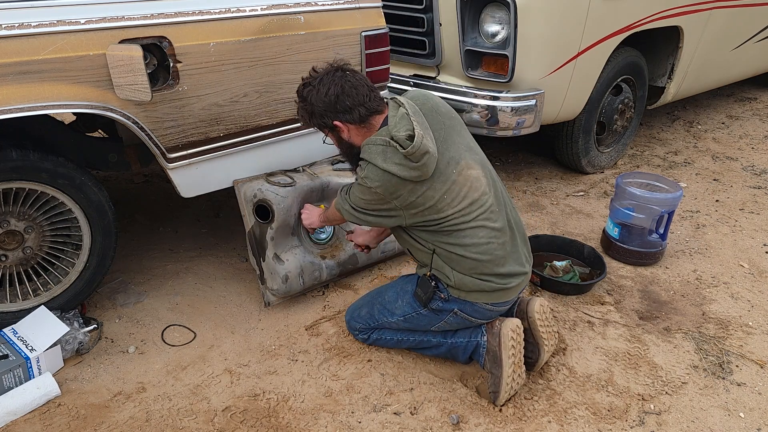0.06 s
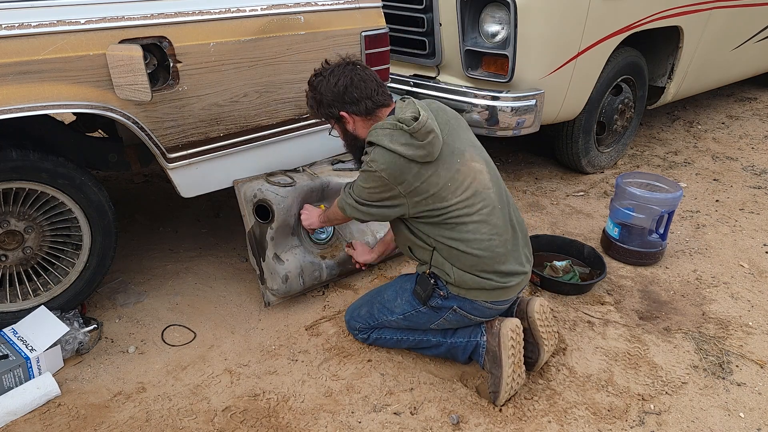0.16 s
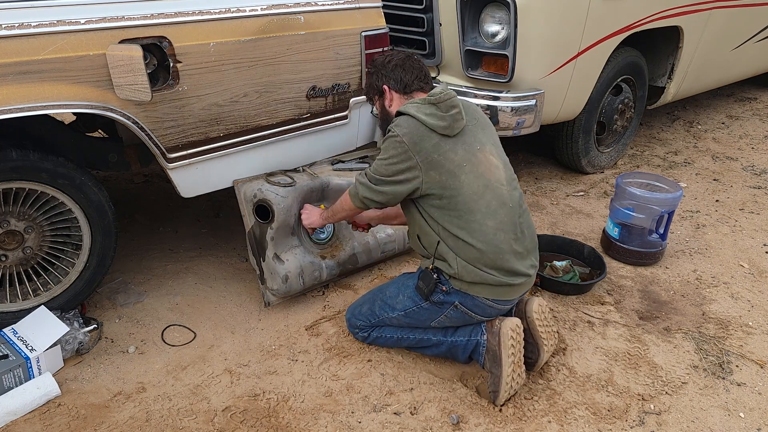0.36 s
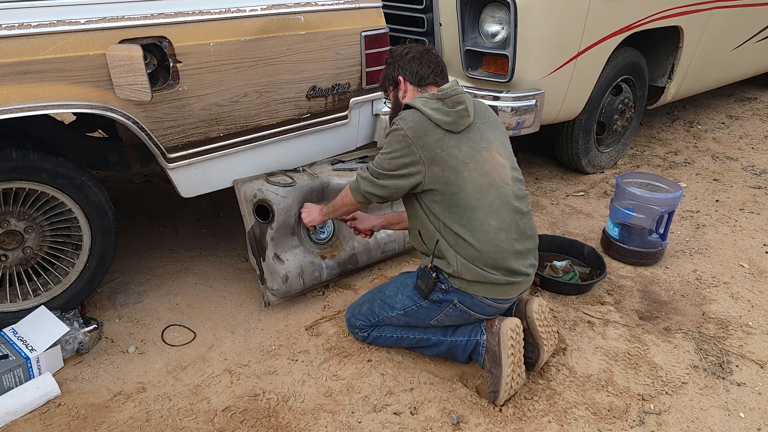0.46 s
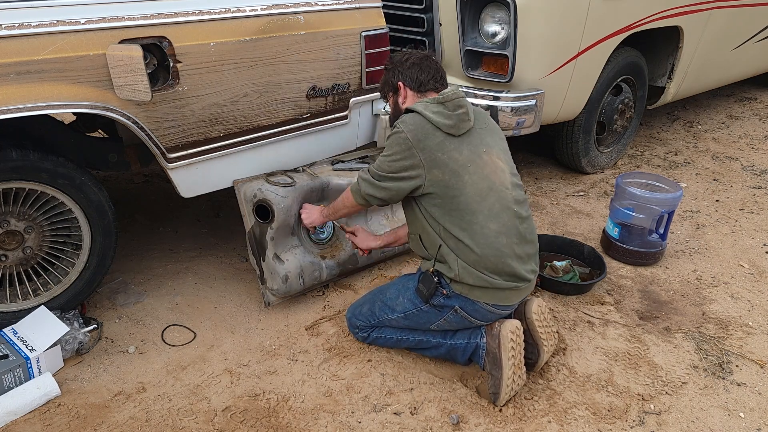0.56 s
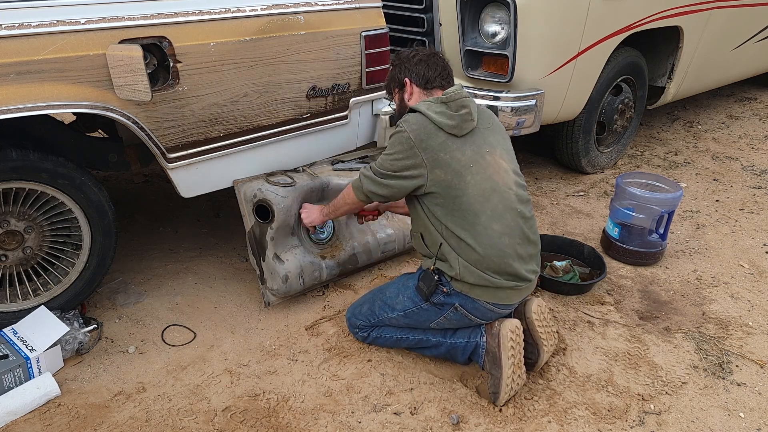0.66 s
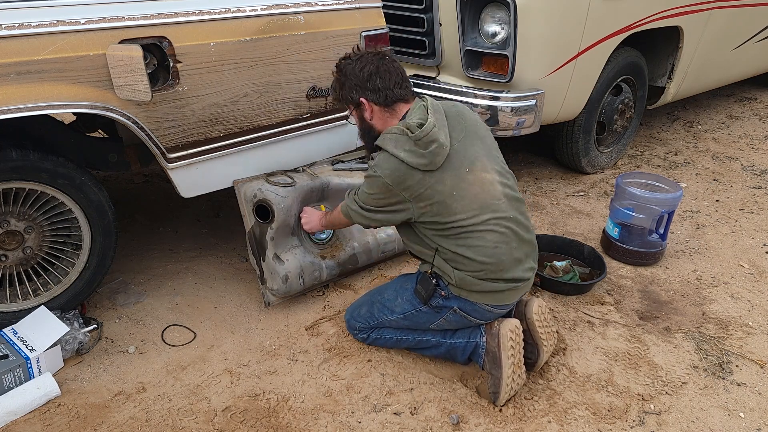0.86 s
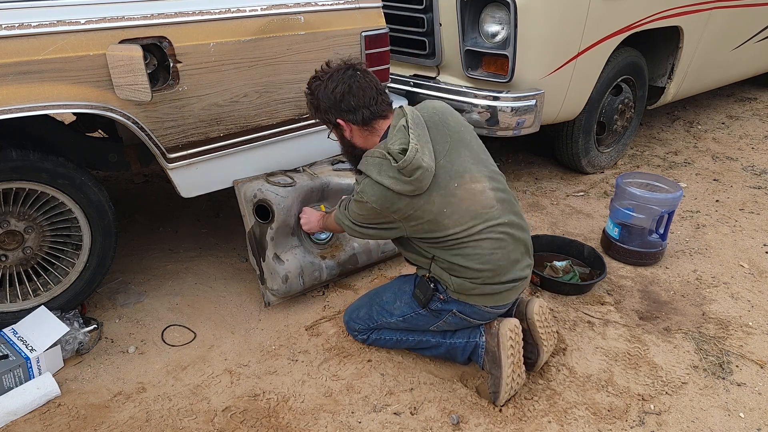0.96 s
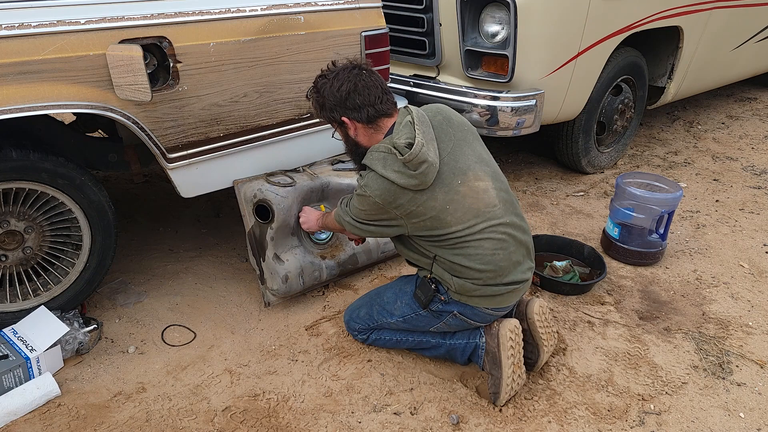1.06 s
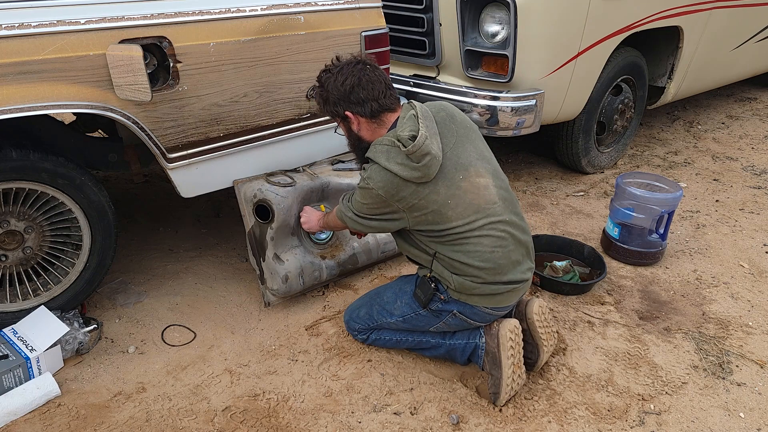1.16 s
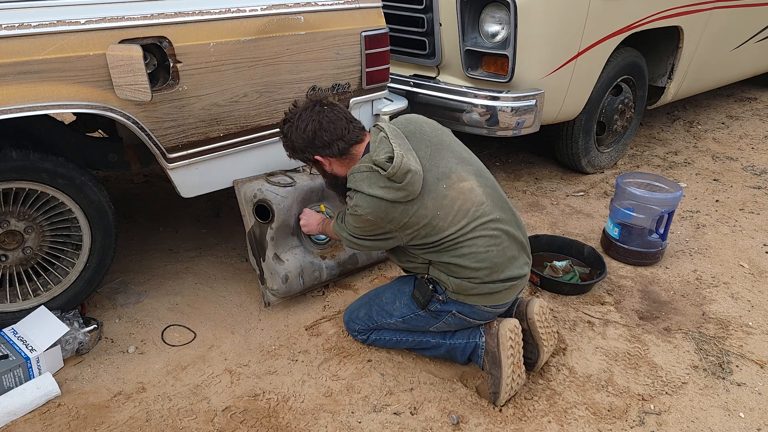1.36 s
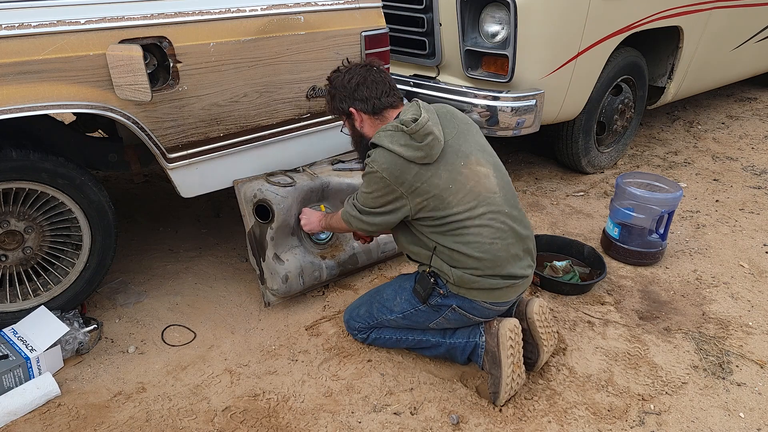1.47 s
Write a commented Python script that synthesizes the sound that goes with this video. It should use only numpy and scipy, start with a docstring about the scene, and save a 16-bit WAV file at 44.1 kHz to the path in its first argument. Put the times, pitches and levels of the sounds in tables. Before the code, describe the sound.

A metal ring clicks, knocks and scrapes against a steel fuel tank outdoors.

```python
"""Outdoors, at a steel fuel tank standing on sand, hands work a metal lock ring into the opening.
One firm clack comes early among the taps, ticks and short scrapes of turning and seating the ring.
Each tap sounds four parts: the tank's panels, the stiff rim of the opening, the ring and a sharp edge.
Sliding rubs the same parts with tiny slips, and single spots ring at pitches of their own.
A quiet bed of air lies underneath."""
import sys
import numpy as np
from scipy import signal
from scipy.fft import rfft, irfft, next_fast_len
from scipy.io import wavfile

SR = 44100
rng = np.random.default_rng(int(sys.argv[2]) if len(sys.argv) > 2 else 0)


def master_out(mix):
    """Clip the mix to full scale and print it as 16-bit PCM to the path in sys.argv[1]."""
    frames = np.transpose(np.atleast_2d(mix))
    ceiling = np.clip(frames, -1, 1)
    pcm = np.round(ceiling * 32767).astype(np.int16)
    wavfile.write(sys.argv[1], SR, pcm)


N = 66150


def amp(db):
    """Decibels to gain."""
    return 10 ** (np.asarray(db) / 20)


def unit(x):
    """x at rms 1."""
    return x / np.sqrt(np.mean(x ** 2) + 1e-20)


def fade(t, t60):
    """Exponential decay, 60 dB down after t60."""
    return np.exp(-np.log(1000) * t / t60)


def add(out, start_s, sound):
    """Mix a sound into out at start_s."""
    room = out[max(round(start_s * SR), 0):][:len(sound)]
    room += sound[:len(room)]


def eq_gains(eq, size):
    """A curve of (freq_hz, gain_db) points as a gain for each FFT bin."""
    freq_hz, gain_db = np.transpose(eq)
    hz = np.fft.rfftfreq(size, 1 / SR)
    return amp(np.interp(np.log(hz + 1), np.log(freq_hz), gain_db))


def coloured(x, eq):
    """x through an EQ curve, at rms 1."""
    return unit(irfft(rfft(x) * eq_gains(eq, len(x)), len(x)))


# Tone of the air bed: freq_hz, gain_db
AIR_EQ = [(25, -9), (60, -3), (130, -14), (170, 0), (220, 3), (300, -1), (600, -8.5), (820, -8),
          (1300, -21), (2400, -22), (3500, -30.5), (6000, -43), (15000, -46.5)]
def air(level_db=-61):
    """Quiet outdoor background: steady, dark noise."""
    return amp(level_db) * coloured(rng.standard_normal(N), AIR_EQ)


# Tone of each part's dense vibration, in scrapes and taps alike: freq_hz, gain_db
PANEL_EQ = [(25, -42), (130, -48.5), (180, -29.5), (220, -2), (290, 0), (360, -3), (470, -3), (600, -11),
            (900, -25.5), (2000, -82.5)]
RIM_EQ = [(200, -48.5), (420, -7.5), (530, -4), (740, -1), (808, 3), (895, -15.5), (1020, 0.5),
          (1150, -12.5), (1400, -14), (2500, -48)]
RING_EQ = [(600, -54.5), (1300, -11), (1800, 3), (2500, 0.5), (2900, -3), (3400, -11), (4200, -13),
           (5500, -20.5), (8000, -24.5), (16000, -52.5)]
EDGE_EQ = [(1500, -32), (3200, 0.5), (4400, -2), (6000, -5), (8000, -2.5), (12000, -2), (15000, -7),
           (16500, -15.5)]
# Slides of the ring, levels before trim: start_s, end_s, panel_db, rim_db, ring_db, edge_db
SCRAPE_CUES = [(-.01, 0.089, -53, -57, -60, -101), (0.099, 0.168, -51, -74, -61.5, -74.5),
               (0.198, 0.334, -61, -56, -60.5, -66), (0.39, 0.462, -51, -66, -87, -101),
               (0.459, 0.559, -45.5, -51, -62, -80), (0.59, 0.745, -54.5, -60, -64.5, -79),
               (0.753, 0.792, -49, -53, -63, -74), (0.86, 0.948, -62, -72, -70, -76),
               (0.962, 1.036, -55, -58, -63.5, -94), (1.12, 1.218, -58, -67, -65.5, -72.5),
               (1.283, 1.331, -71, -62, -62, -64.5), (1.365, 1.449, -67, -75, -68, -65.5),
               (1.44, 1.51, -52.5, -57, -60, -68)]
def scrapes(trim_db=-5.5, ramp_s=0.017, slips_per_s=2700, slip_spread_db=2, hiss_gain=0.73):
    """The ring slides on the rim: tiny slips of metal on metal excite all four parts."""
    t, out = np.arange(N) / SR, np.zeros(N)
    slips = (rng.random(N) < slips_per_s / SR) * rng.standard_normal(N)
    slips *= amp(slip_spread_db * rng.standard_normal(N))
    friction = unit(slips) + hiss_gain * rng.standard_normal(N)
    layers = [coloured(friction, eq) for eq in (PANEL_EQ, RIM_EQ, RING_EQ, EDGE_EQ)]
    for start_s, end_s, *levels_db in SCRAPE_CUES:
        stroke = np.clip(np.minimum(t - start_s, end_s - t) / ramp_s + .5, 0, 1)
        out += stroke * sum(amp(db) * layer for db, layer in zip(levels_db, layers))
    return amp(trim_db) * out


def push(eq, size):
    """The transient of a blow: a minimum-phase pulse with the tone of eq, at energy 1."""
    cepstrum = irfft(np.log(eq_gains(eq, size)), size)
    causal = 2 * cepstrum * (np.arange(size) < size // 2)
    pulse = irfft(np.exp(rfft(causal)), size)
    return pulse / np.linalg.norm(pulse)


def struck_part(modes, eq, attacks_s, body_t60_s, push_db, modes_db, tail_db, tail_t60_s):
    """One part's answer to each blow, a row each: push, ringing modes, dense body and a faint tail."""
    size, span = 6144, round(0.0035 * SR)  # a hit's level is set by its loudest 3.5 ms
    scatter_db, hard_attack_s = 2.5, 0.00069  # faster contacts snap, slower ones only rub
    t = np.arange(size) / SR
    pulse = push(eq, size)
    attack = 1 - np.exp(-t / np.maximum(attacks_s[:, None], 1 / SR))
    decay = fade(t, body_t60_s) + amp(tail_db) * fade(t, tail_t60_s)
    chatter = rng.standard_normal(attack.shape) * attack * decay
    body = signal.fftconvolve(chatter, pulse[None], axes=1)[:, :size]
    pitch_hz, level_db, t60_s = np.transpose(modes)
    gains = amp(level_db + scatter_db * rng.standard_normal((len(attacks_s), len(modes))))
    gains /= np.linalg.norm(gains, axis=1, keepdims=True)
    ringing = gains @ (fade(t, t60_s[:, None]) * np.sin(2 * np.pi * pitch_hz[:, None] * t))
    hits = body + amp(modes_db) * attack * ringing
    for hit, attack_s in zip(hits, attacks_s):  # the push comes as the force peaks
        snap = amp(push_db) / (1 + (attack_s / hard_attack_s) ** 2)
        add(hit, attack_s, snap * np.linalg.norm(hit[:span]) * pulse)
    energy = np.cumsum(hits ** 2, axis=1)
    power = (energy[:, span:] - energy[:, :-span]) / span
    return hits / np.sqrt(power.max(axis=1, keepdims=True))


# Resonances, balanced within each part: pitch_hz, level_db, t60_s
PANEL_MODES = [(237, -6, 0.038), (294, -1, 0.07), (335, -2, 0.032), (434.5, 0.5, .06), (506, -1, 0.036)]
RIM_MODES = [(646, -12, 0.045), (808, 4.5, 0.054), (967, -2, 0.043), (1033.3, -5.5, 0.057),
             (1205, -10.5, 0.05)]
RING_MODES = [(1414, -3.5, 0.037), (1757, 7.5, 0.024), (1940, -1.5, 0.068), (2157, -2, 0.073),
              (2375, 0, 0.069), (2670, -9, 0.036), (2802, -5.5, 0.06), (3256, -18.5, 0.054),
              (4100, -15, 0.07), (5270, -12, 0.076)]
EDGE_MODES = [(4424, -1.2, 0.048), (7620, 0.01, 0.069), (9070, -1.5, 0.043)]
# Contacts, levels before trim: start_s, panel_db, rim_db, ring_db, edge_db, attack_s
TAP_CUES = [(.003, -43.5, -48.5, -48.5, -66, 0.0025), (.100, -43, -51, -55.5, -66, 0.0016),
            (0.143, -47, -62, -56, -62, .002), (0.2065, -26, -21, -31, -54, 0.00059),
            (0.2232, -43, -41.5, -46, -57, 0.00061), (0.2284, -43, -42, -54, -51, 0.001),
            (.233, -52, -50, -64, -54, 0.0014), (.305, -53.5, -42, -58.5, -72, 0.006),
            (0.3853, -43.5, -44, -48, -57.5, 0.00074), (.402, -45.5, -51, -59, -86, 0.0012),
            (.447, -44.5, -50, -55, -73, 0.0011), (.470, -46.5, -46.5, -55.5, -52.5, 0.0041),
            (0.4759, -32.5, -43.5, -57.5, -64, 0.0011), (.496, -49, -52, -58, -71, 0.00081),
            (.511, -41, -49, -65, -80, 0.00069), (.545, -42, -43, -60.5, -77, 0.0037),
            (.569, -43, -53.5, -47.5, -53.5, 0.00039), (0.5742, -30, -37, -50.5, -56, 0.0011),
            (.592, -34, -40.5, -50.5, -56.5, 0.0018), (0.6222, -30.5, -36.5, -51, -64, 0.00056),
            (0.6604, -35, -41, -58, -66, 0.0014), (0.6674, -36, -37, -42.5, -50.5, 0.00024),
            (0.691, -37, -39, -47.5, -50, 0.0007), (0.7055, -62, -53, -52, -52.5, 0.00031),
            (.719, -49, -50, -59, -75, 0.00071), (.755, -47.5, -54, -57, -69, 0.0011),
            (.771, -45, -55, -61.5, -70, 0.00078), (.813, -39, -44.5, -53.5, -56, 0.00066),
            (0.8594, -44.5, -55, -62, -56, 0.0018), (.902, -45.5, -59, -66.5, -70, 0.0017),
            (0.9565, -42, -44, -47, -53, 0.00058), (1.014, -49, -44.5, -54, -61.5, 0.00086),
            (1.039, -43.5, -45.5, -56.5, -84, 0.0015), (1.045, -41.5, -56, -60, -93, 0.0026),
            (1.117, -42, -41.5, -49.5, -68, 0.0019), (1.129, -48, -41, -48.5, -71, 0.0016),
            (1.139, -31.5, -36, -43, -48, 0.00083), (1.2182, -39.5, -40, -50, -43.5, 0.0015),
            (1.289, -69, -47, -53.5, -58, 0.00069), (1.2945, -66, -49.5, -51, -51, 0.00027),
            (1.308, -62, -53.5, -58, -53, 0.00035), (1.316, -60, -56, -72, -55, 0.00036),
            (1.331, -48, -63, -67, -74, 0.00097), (1.368, -40.5, -41, -49, -54.5, 0.00093),
            (1.3727, -44.5, -49, -50, -62, 0.00079), (1.448, -39, -44, -49, -73, 0.00071),
            (1.469, -47.5, -49, -53.5, -78, 0.00059)]
def taps(trim_db=-3):
    """The ring knocks on the tank: each contact shares its force between panels, rim, ring and edge."""
    starts_s, *levels_db, attacks_s = np.transpose(TAP_CUES)
    panel = struck_part(PANEL_MODES, PANEL_EQ, attacks_s, body_t60_s=0.0027,
                        push_db=-1.5, modes_db=-1.5, tail_db=-32, tail_t60_s=0.43)
    rim = struck_part(RIM_MODES, RIM_EQ, attacks_s, body_t60_s=0.026,
                      push_db=-1.5, modes_db=1.5, tail_db=-29, tail_t60_s=0.56)
    ring = struck_part(RING_MODES, RING_EQ, attacks_s, body_t60_s=0.0548,
                       push_db=-3.5, modes_db=-1, tail_db=-19, tail_t60_s=0.1842)
    edge = struck_part(EDGE_MODES, EDGE_EQ, attacks_s, body_t60_s=0.0227,
                       push_db=0, modes_db=-18.5, tail_db=-9.5, tail_t60_s=0.0374)
    hits = sum(amp(db)[:, None] * layer for db, layer in zip(levels_db, (panel, rim, ring, edge)))
    out = np.zeros(N)
    for start_s, hit in zip(starts_s, hits):
        add(out, start_s, hit)
    return amp(trim_db) * out


# Pitched accents, loose sheet low and thin edges high: start_s, pitch_hz, level_db, t60_s
SPOT_CUES = [(.004, 426, -38.5, 0.057), (0.063, 4480, -62.5, .031), (.133, 4130, -60, 0.076),
             (0.2072, 458, -25, 0.031), (0.223, 4120, -42, 0.024), (.226, 7500, -59, 0.035),
             (0.235, 7600, -55, 0.045), (.511, 585, -47, .052), (.624, 2760, -58.5, 0.069),
             (.670, 2770, -48.5, 0.07), (0.7051, 12040, -50, 0.0061), (0.862, 4500, -63.5, 0.076),
             (.957, 1800, -45.5, 0.025), (.957, 2270, -53.5, .07), (1.046, 262.4, -37.5, 0.055),
             (1.138, 1260, -34, 0.013), (1.138, 13000, -41.5, 0.0053), (1.218, 13700, -41.5, 0.0038),
             (1.220, 3965, -54.5, 0.071), (1.220, 5350, -50.5, 0.051), (1.2941, 11840, -34, 0.0041),
             (1.316, 8660, -65.5, 0.049), (1.368, 9930, -50.5, 0.023), (1.3733, 2653, -52, 0.053)]
# The cluster in each accent: pitch_ratio, gain_db
SPOT_PARTIALS = [(1, 2.5), (.92, -6.5), (1.07, -4)]
def ringing_spots():
    """A flicked spot of metal rings briefly on three close partials."""
    t, out = np.arange(6144) / SR, np.zeros(N)
    for start_s, pitch_hz, level_db, t60_s in SPOT_CUES:
        cluster = sum(amp(gain_db) * np.sin(2 * np.pi * (pitch_hz * ratio * t + rng.random()))
                      for ratio, gain_db in SPOT_PARTIALS)
        attack = 1 - np.exp(-2 * pitch_hz * t)
        add(out, start_s, amp(level_db) * attack * fade(t, t60_s) * cluster)
    return out


def scene():
    """The work on the tank over the still air, in mono."""
    return (taps() + ringing_spots() + scrapes() + air())[None]


def record(dry):
    """The microphone thins the bass, and the very top of the treble is cut off."""
    low_cut_hz, shelf_db, top_hz = 198.4, -19, 16300
    size = next_fast_len(N + SR // 4)
    hz = np.fft.rfftfreq(size, 1 / SR)
    low_shelf = np.maximum(1 / (1 + (low_cut_hz / (hz + 1)) ** 12), amp(shelf_db))
    return irfft(rfft(dry, size) * low_shelf * (hz < top_hz), size)[:, :N]


dry = scene()
out = record(dry)
master_out(out)
```